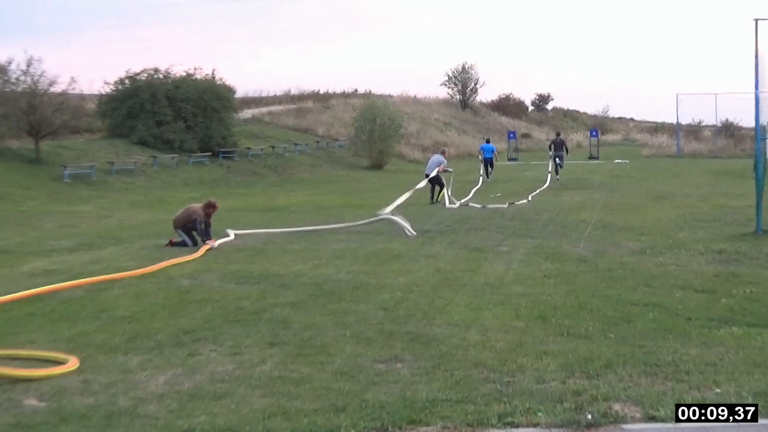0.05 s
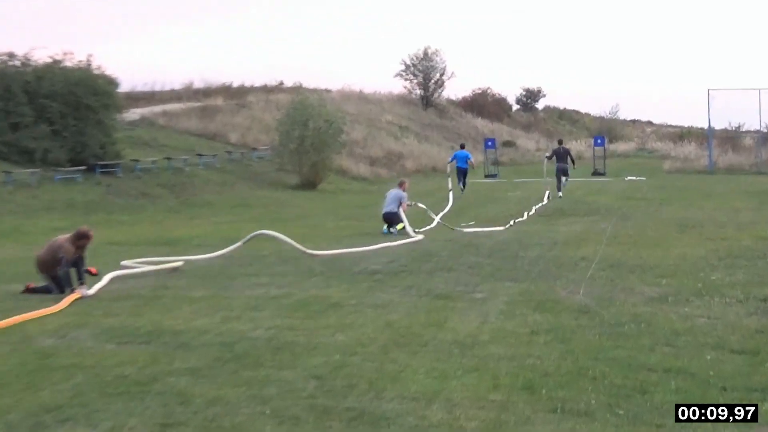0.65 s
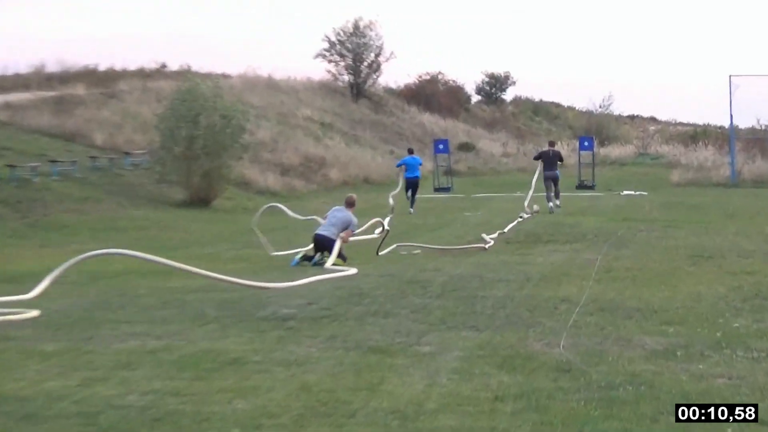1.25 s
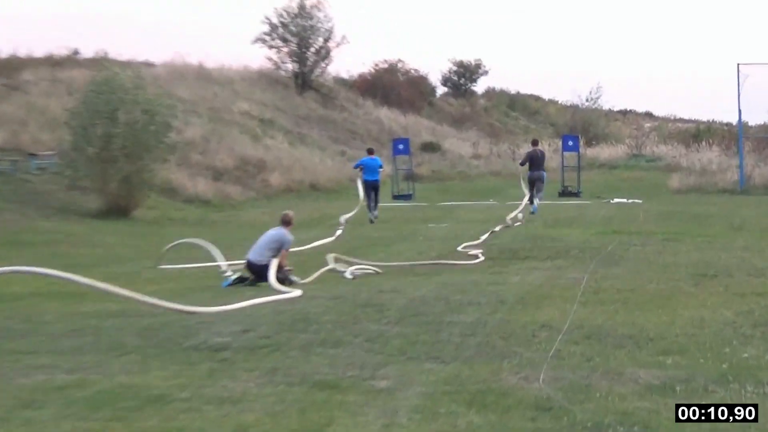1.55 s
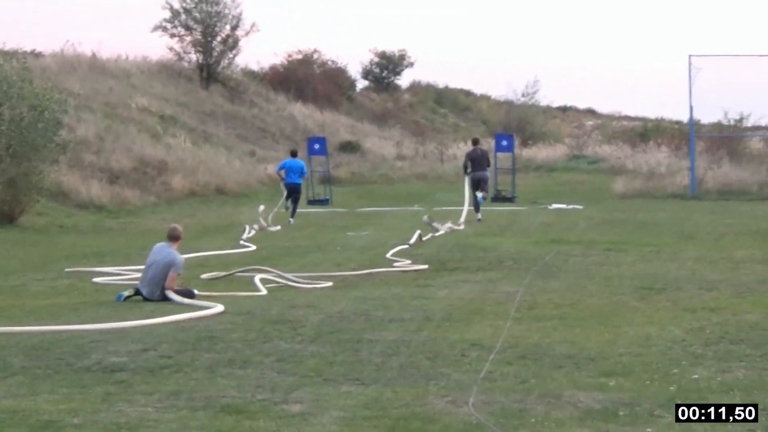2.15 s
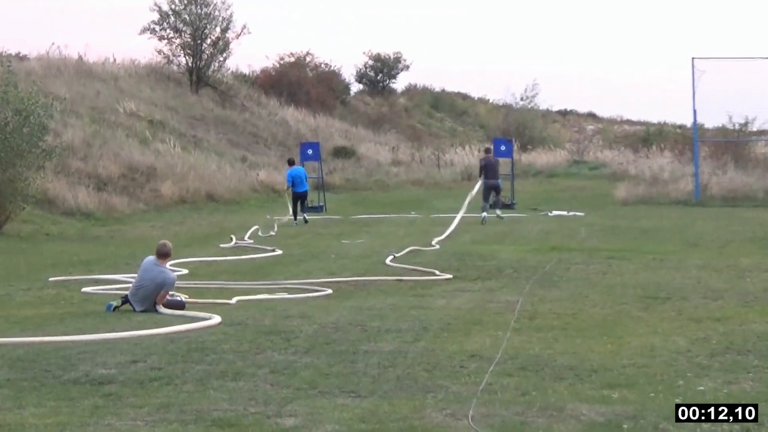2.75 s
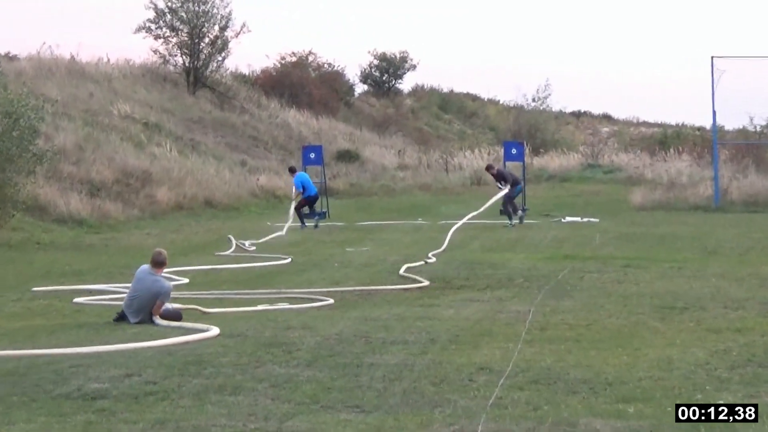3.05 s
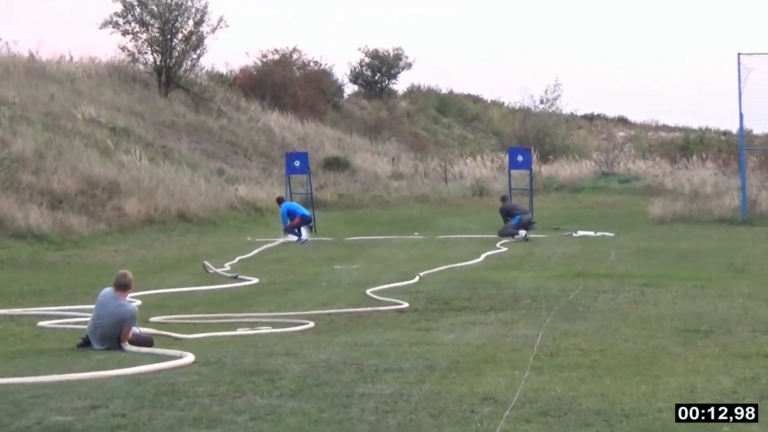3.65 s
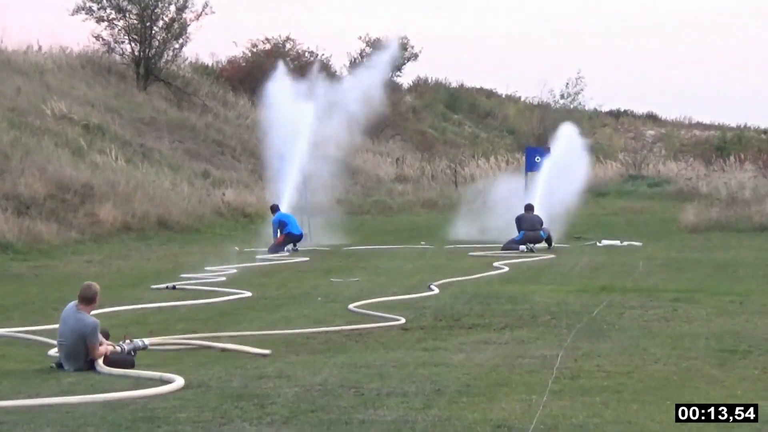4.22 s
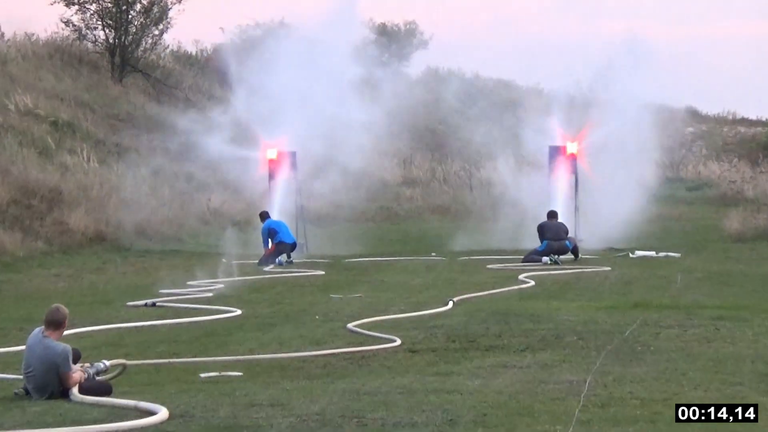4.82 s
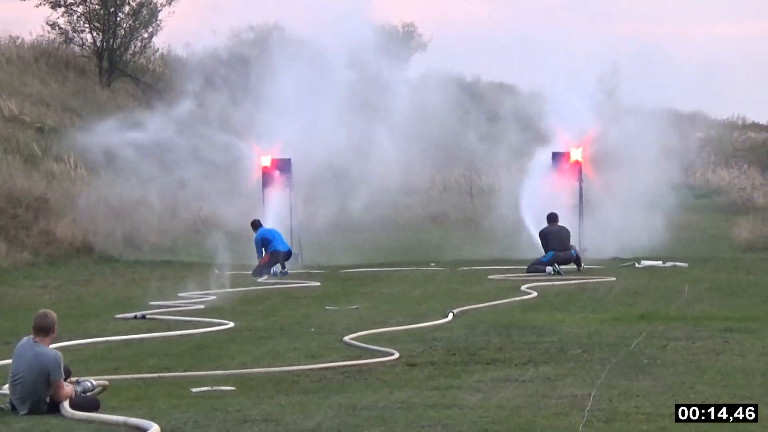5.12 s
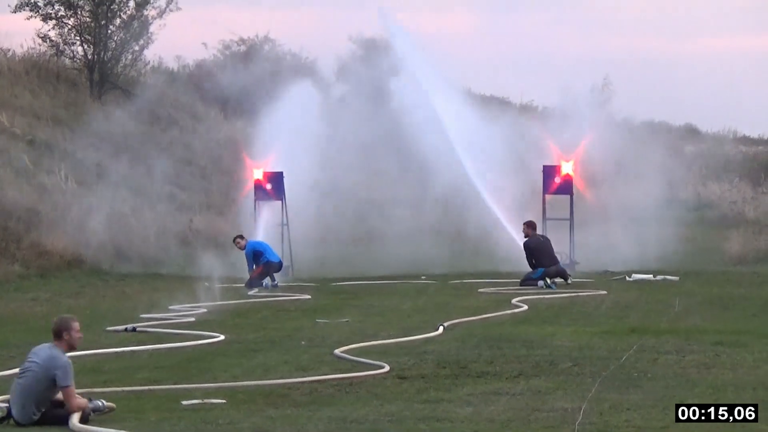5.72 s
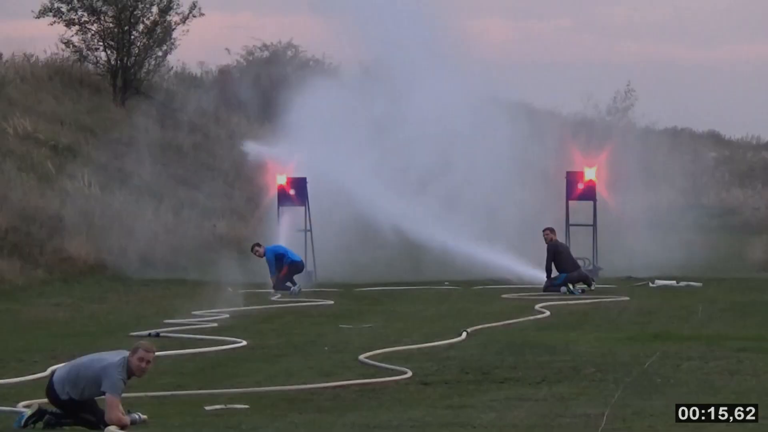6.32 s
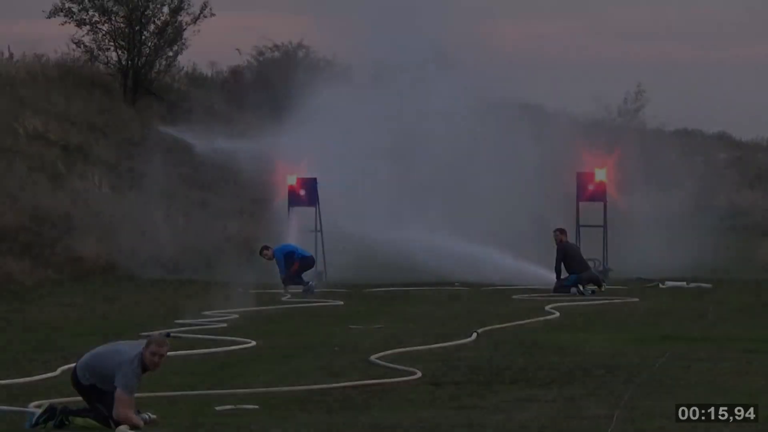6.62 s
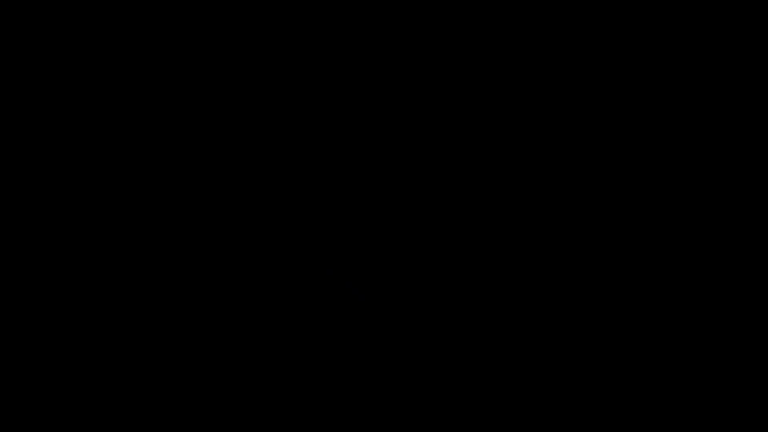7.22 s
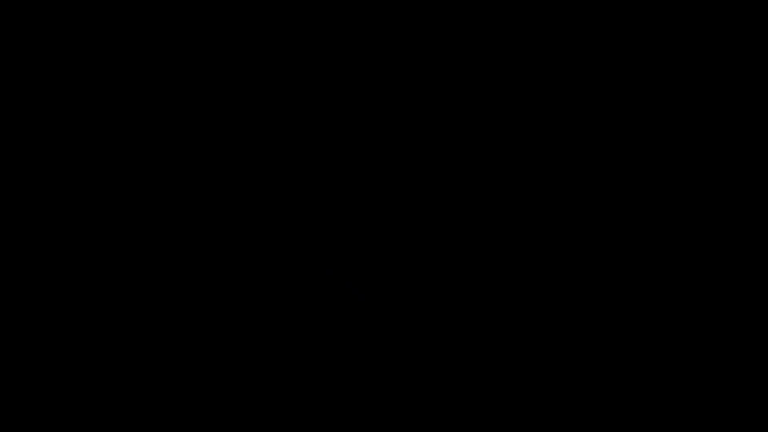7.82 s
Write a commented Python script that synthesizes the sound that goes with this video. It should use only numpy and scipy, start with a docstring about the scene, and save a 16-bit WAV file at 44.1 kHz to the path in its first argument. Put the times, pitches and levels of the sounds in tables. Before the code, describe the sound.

A petrol fire pump roars flat out nearby, revs a little higher, then winds down and fades away.

```python
"""Fire pump running flat out

A four-cylinder petrol fire pump roars through an open exhaust on a grass field, close by on the left.
Each firing feeds a deep drone, cracks in the pipe and tears out a puff of hiss that rings the metal.
Revs and throttle drive it all: the tones swell and sink as they slide through fixed resonances.
The revs climb, then the throttle closes, the exhaust pops and the sound fades away."""
import sys
import numpy as np
from scipy import signal
from scipy.fft import rfft, irfft, next_fast_len
from scipy.io import wavfile
from scipy.ndimage import map_coordinates

SR = 44100
rng = np.random.default_rng(int(sys.argv[2]) if len(sys.argv) > 2 else 0)


def output_pcm(signal):
    """Save a mono or channel-first signal as 16-bit PCM at the path in sys.argv[1].

    Samples are clipped to [-1, 1] before scaling.
    """
    pcm = np.clip(np.atleast_2d(signal).T, -1, 1) * 32767
    wavfile.write(sys.argv[1], SR, np.round(pcm).astype(np.int16))


N = 351477

# The revs. Each row: time in seconds, firings per second.
REVS = [(0.0, 142.5), (0.4, 141.7), (0.8, 141.2), (1.2, 144.6), (1.55, 144.6), (2.05, 147.9), (2.55, 149.5),
        (3.25, 151.7), (4.0, 151.2), (4.5, 159.5), (5.08, 167.3), (5.52, 162.6), (5.78, 157.2),
        (5.96, 150.2), (6.16, 140.3), (6.42, 130.1), (6.64, 114.6), (6.86, 104.6), (7.12, 93.6)]
# The throttle move. Each row: time in seconds, opening from 0 to 1.
THROTTLE_MOVE = [(0, 1), (5.65, 0.98), (6.0, 0.7), (6.25, 0.74), (6.55, 0.29), (7.1, 0.14)]
# How each layer rides the engine. Each holds: gain in dB at working revs and full throttle,
# dB added per octave of revs, dB added per halving of the throttle.
CRACK_RIDE = (-26.5, 20, 3.6)
HISS_RIDE = (-22, 3, -4.5)
SPIT_RIDE = (-29, 3, -7.5)
RING_RIDE = (-27.5, 2.6, -.3)
WEAK_RIDE = (-3, 6.8, 2.1)
RUMBLE_RIDE = (-30, 7.2, 4.6)
# The drone's strong tones, as multiples of the four-stroke cycle rate.
STRONG_ORDERS = (4, 8, 10, 12, 16, 20)
# Their trims. Each row: gain in dB, dB added per halving of the throttle.
STRONG_TRIMS = [(0.14, 0.6), (0.2, 1.5), (-7.2, -4), (0.05, -0.1), (0, -2.5), (0.2, -4.5)]
# Peaks and notches the strong tones slide through. Each row: frequency in Hz, base level in dB.
PIPE_RESONANCES = [(120, -25), (142, -20), (167, -16), (200, -23), (243, -43.5), (265, -25.5), (284, -19.5),
                   (303, -23.5), (319, -16.5), (355, -20.5), (380, -15.5), (422, -15.5), (435, -13),
                   (470, -14), (499, -20.5), (516, -32.5), (562, -27), (591, -20.5), (622, -28),
                   (662, -19.5), (708, -27), (760, -31.5), (790, -43)]
# The pipe's colour on the weak tones. Each row: frequency in Hz, base level in dB.
WEAK_EQ = [(38, -52.5), (75, -62), (115, -44), (185, -28.5), (235, -42), (330, -32.5), (420, -26.5),
           (490, -37.5), (535, -39), (600, -34.5), (690, -33), (800, -42), (1000, -38), (1270, -53.5)]
# Firings that pop as the throttle closes. Each row: time in seconds, boost in dB.
EXHAUST_POPS = [(6.621, 7.5), (6.692, 4.5)]
# Unequal cylinders in firing order. Each row: crack in dB, hiss in dB, lateness in firing intervals.
CYLINDERS = [(-2, 1, 0), (-9, 1, -.03), (0.5, 3.5, 0.0059), (-7, 0, -.04)]
# Colours of the crack, hiss, spit and rumble. Each row: frequency in Hz, relative level in dB.
CRACK_EQ = [(450, -40.5), (720, -16), (850, 2.5), (1020, -3.5), (1280, -7), (1500, 1), (2000, -1.5),
            (2320, 4), (2800, -11), (3180, 6), (3700, -17), (5000, -11.5), (6600, -15), (9000, -32.5)]
HISS_EQ = [(500, -19), (1000, -6), (1280, -8.5), (1500, 0.3), (2300, -0.5), (2800, -8.5), (3600, -4.5),
           (4200, -5), (5200, -1), (6600, -2), (8000, -17.5), (12000, -12), (15500, -24)]
SPIT_EQ = [(2000, -22.5), (5000, 0.5), (7000, -3.5), (8500, -12.5), (10000, -3), (12000, 4), (15500, -1)]
RUMBLE_EQ = [(15, -34), (35, -19.5), (65, -19), (130, -7.5), (240, -6.5), (370, -2), (450, -1),
             (530, -12.5), (620, -5.5), (800, -13), (1050, -15), (1500, -24.5), (5000, -46.5)]
# The ring of the pipe's metal. Each row: frequency in Hz, width in Hz, relative level in dB.
METAL_MODES = [(1090, 130, 1.5), (3110, 130, 0), (3250, 150, 0), (5080, 170, -6), (5700, 150, -3),
               (6450, 400, -10)]
# The stereo balance. Each row: frequency in Hz, left minus right in dB.
LEFT_BALANCE = [(60, 4.5), (160, 7), (270, 10.5), (450, 7.5), (740, 8), (1220, 5), (2000, 9), (3300, 6),
                (5500, 3), (7000, 2), (8000, 15.5), (9100, -13), (10200, -5), (11000, 4)]
# The stereo phase. Each row: frequency in Hz, lead of the left side in radians.
LEFT_LEAD = [(7200, 0), (7800, .4), (8450, 1.7), (9200, .1), (9600, 0)]
# A straight fade-out. Each row: time in seconds, gain.
FADE_OUT = [(6.0, 1), (7.14, 0)]

WORKING_HZ, TOP_HZ = 150, 15850
BOOM_HZ, BOOM_WIDTH_HZ, BOOM_DB = 420, 17, 9  # the pipe's own note
WAVER_DB = .32  # unsteadiness of the strong tones at full throttle; it grows as the throttle closes


def amp(db):
    """Decibels to gain."""
    return 10 ** (np.asarray(db) / 20)


def unit(x):
    """Scale to rms 1."""
    return x / np.sqrt(np.mean(x ** 2) + 1e-20)


def along(points, hz):
    """Read (Hz, value) points on a log frequency axis."""
    knots_hz, values = np.transpose(points)
    return np.interp(np.log(hz + 1), np.log(knots_hz + 1), values)


def automation(rows):
    """Join (seconds, value) points into one value per sample."""
    return np.interp(np.arange(N) / SR, *np.transpose(rows))


def level(ride, firing_hz, throttle):
    """Gain of a layer from the revs and the throttle."""
    db, revs_db, closing_db = ride
    return amp(db + revs_db * np.log2(firing_hz / WORKING_HZ) - closing_db * np.log2(throttle))


def wobble(rate):
    """A smooth random curve, rate knots a second."""
    return map_coordinates(rng.standard_normal(int(N * rate / SR) + 4), [np.arange(N) * rate / SR])


def filtered(x, response):
    """Filter x by a complex response of frequency."""
    size = 2 * next_fast_len(N // 2 + SR // 8)
    return irfft(rfft(x, size) * response(np.fft.rfftfreq(size, 1 / SR)), size)[..., :N]


def coloured(x, eq, size=4096):
    """Send x through a minimum-phase EQ and scale to rms 1."""
    cepstrum = irfft(np.log(amp(along(eq, np.fft.rfftfreq(size, 1 / SR)))))
    cepstrum[1:size // 2] *= 2
    cepstrum[size // 2:] = 0
    return unit(signal.oaconvolve(x, irfft(np.exp(rfft(cepstrum))))[:N])


def pulses(times, sizes):
    """Clicks placed between samples."""
    at = times[:, None] * SR
    taps = np.floor(at).astype(int) + np.arange(-7, 9)
    shape = np.sinc(taps - at) * np.cos(np.pi * (taps - at) / 16) ** 2
    return np.bincount(np.clip(taps, 0, N).ravel(), (sizes[:, None] * shape).ravel(), N + 1)[:N]


def drone(cycle, firing_hz, throttle):
    """The exhaust's body: strong tones lock to the firing, unequal cylinders add weak, drifting ones."""
    out = np.zeros(N)
    cycle_hz = firing_hz / len(CYLINDERS)
    for order, (trim_db, closing_db) in zip(STRONG_ORDERS, STRONG_TRIMS):
        hz = order * cycle_hz
        db = along(PIPE_RESONANCES, hz) + trim_db - closing_db * np.log2(throttle)
        # as the throttle closes, the pipe booms whenever a tone crosses its note
        db += BOOM_DB * (1 - throttle) / (1 + ((hz - BOOM_HZ) / BOOM_WIDTH_HZ) ** 2)
        db += WAVER_DB / throttle * wobble(22)
        lag = order ** 2 / 42  # the pipe holds back the higher tones and smears each pulse
        out -= amp(db) * np.cos(2 * np.pi * order * cycle - lag)
    weak_gain = level(WEAK_RIDE, firing_hz, throttle)
    for order in np.setdiff1d(np.arange(1, 33), STRONG_ORDERS):
        db = along(WEAK_EQ, order * cycle_hz)
        db += 9 * (order % len(CYLINDERS) == 0)  # firing multiples stand out
        db += .35 * order * np.log2(cycle_hz / cycle_hz[0])  # lower revs, duller tone
        drift = rng.uniform(0, 2 * np.pi) + wobble(5) / 6
        out += weak_gain * amp(db + 1.5 * wobble(3)) * np.cos(2 * np.pi * order * cycle + drift)
    return np.sqrt(2) * out


def firings(cycle):
    """No two burns are alike: the time, crack size and puff size of each."""
    count = np.arange(1, int(cycle[-1] * len(CYLINDERS)))
    crack_db, hiss_db, late = np.array(CYLINDERS)[count % len(CYLINDERS)].T
    times = np.interp(count + late, cycle * len(CYLINDERS), np.arange(N) / SR)
    jitter, burn, gas = rng.standard_normal((len(count), 3)).T
    slowness = np.gradient(times) / np.median(np.diff(times))
    times += 1.7e-5 * slowness ** 6 * jitter  # the timing loosens as the revs fall
    burn_db = .85 * burn
    for pop_time, boost_db in EXHAUST_POPS:
        burn_db[np.abs(times - pop_time).argmin()] += boost_db
    return times, amp(crack_db + burn_db), amp(hiss_db + burn_db + 1.4 * gas)


def exhaust(cycle, firing_hz, throttle):
    """Each opening valve fires a shock crack and a puff of hiss; the pipe's metal rings after it."""
    times, crack_sizes, puff_sizes = firings(cycle)
    shocks = coloured(pulses(times, crack_sizes), CRACK_EQ)
    crack = reflections(shocks, t60=0.042, wet_db=3)
    # a closing throttle softens the puffs into a steadier flow; the spit is their brightest sizzle
    hiss = puffs(times, puff_sizes, rise_s=0.00014, decay_s=0.0027, steady=0.64 / throttle)
    spit = puffs(times, puff_sizes, rise_s=0.0002, decay_s=0.0031, steady=0.2 / throttle)
    ring_drive = puffs(times + 0.0015, puff_sizes, rise_s=0.0004, decay_s=0.0018, steady=0.14 / throttle)
    layers = [(crack, CRACK_RIDE),
              (coloured(hiss, HISS_EQ), HISS_RIDE),
              (coloured(spit, SPIT_EQ), SPIT_RIDE),
              (unit(filtered(ring_drive, pipe_metal)), RING_RIDE)]
    return sum(sound * level(ride, firing_hz, throttle) for sound, ride in layers)


def puffs(times, sizes, rise_s, decay_s, steady):
    """Gas noise flares at each firing and dies back to a steady flow."""
    t = np.arange(SR // 40) / SR
    envelope = (1 - np.exp(-t / rise_s)) * np.exp(-t / decay_s)
    flare = signal.oaconvolve(pulses(times, sizes), envelope)[:N]
    return (unit(flare) + steady) / (1 + steady) * rng.standard_normal(N)


def pipe_metal(hz):
    """The pipe wall responds as a bank of ringing band-passes."""
    return sum(amp(db) * 1j * hz * width / (centre ** 2 - hz ** 2 + 1j * hz * width)
               for centre, width, db in METAL_MODES)


def rumble(firing_hz, throttle):
    """Turbulent gas and the shaking engine fill the gaps between the tones."""
    gain = level(RUMBLE_RIDE, firing_hz, throttle) * amp(1.3 * wobble(7.8))
    return gain * coloured(rng.standard_normal(N), RUMBLE_EQ)


def reflections(x, t60, wet_db):
    """The pump's frame and the ground add a short spray of echoes."""
    t = np.arange(SR // 16) / SR
    tail = rng.standard_normal(len(t)) * amp(-60 * t / t60) * (1 - np.exp(-t / 0.00049))
    return unit(x + amp(wet_db) * signal.oaconvolve(x, tail / np.linalg.norm(tail))[:N])


def pan_left(hz):
    """Left and right responses to a source nearer the left side."""
    ratio = amp(along(LEFT_BALANCE, hz))
    turn = np.exp(.5j * along(LEFT_LEAD, hz))
    return 2 * np.array([ratio * turn, 1 / turn]) / (1 + ratio)


def scene():
    """Drone, exhaust and rumble play as one engine, placed on the left."""
    firing_hz = automation(REVS)
    throttle = np.clip(automation(THROTTLE_MOVE), .05, 1)
    cycle_hz = firing_hz * (1 + 0.00056 * wobble(14)) / len(CYLINDERS)
    cycle = np.cumsum(cycle_hz) / SR  # four-stroke cycles so far
    engine = drone(cycle, firing_hz, throttle)
    engine += exhaust(cycle, firing_hz, throttle)
    engine += rumble(firing_hz, throttle)
    return filtered(engine, pan_left)


def record(dry):
    """Round off the highest peaks, fade out, and trim the sub-bass and the very top."""
    rounded = dry / (1 + np.abs(dry) ** 12) ** (1 / 12)
    faded = rounded * automation(FADE_OUT)
    return filtered(faded, lambda hz: hz / np.hypot(hz, 15) * np.clip((TOP_HZ - hz) / 150, 0, 1))


dry = scene()
out = record(dry)
output_pcm(out)
```